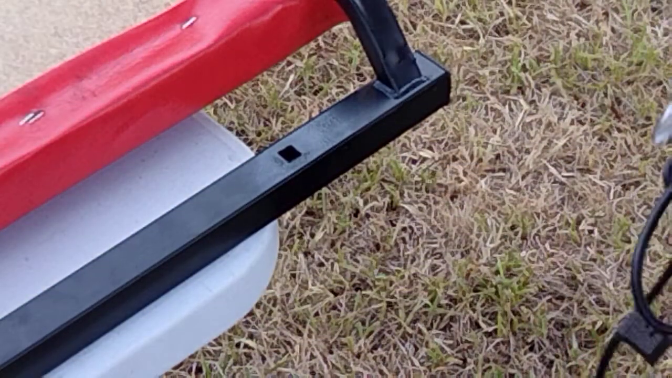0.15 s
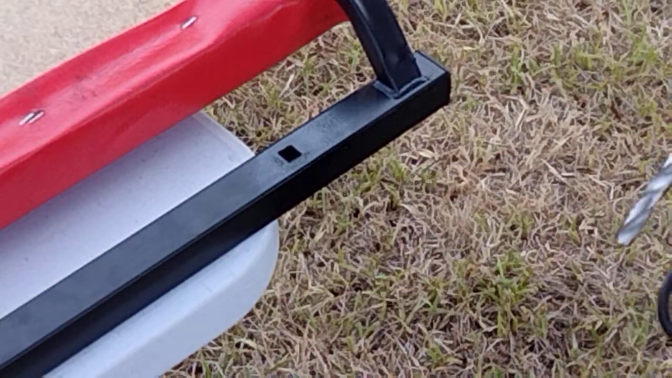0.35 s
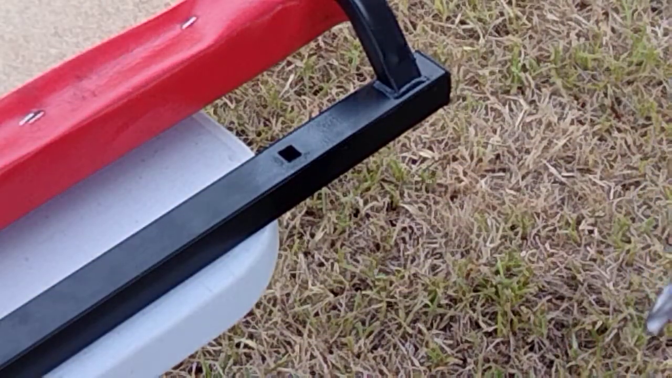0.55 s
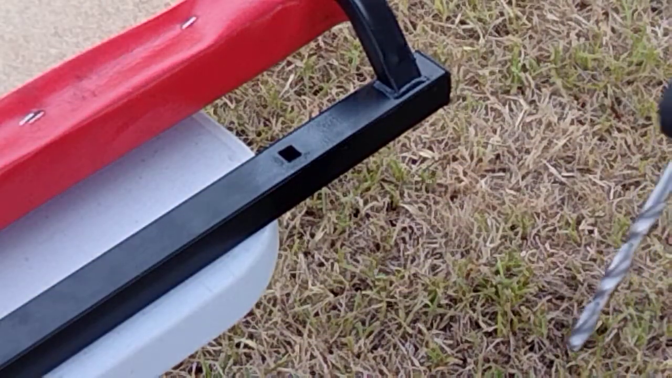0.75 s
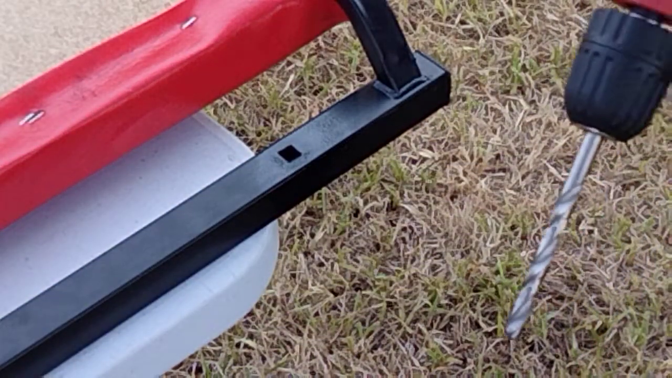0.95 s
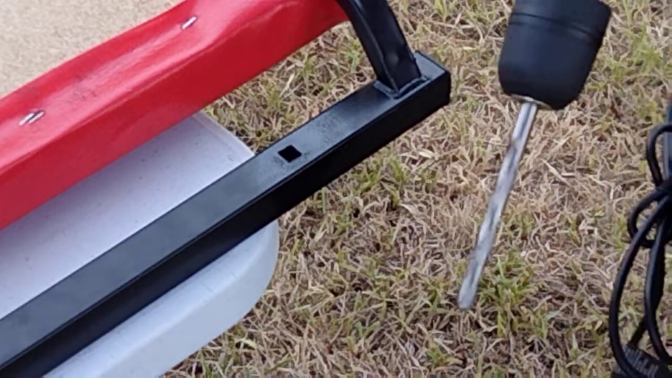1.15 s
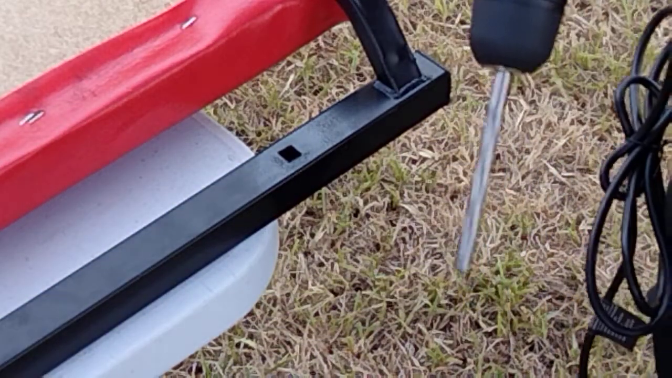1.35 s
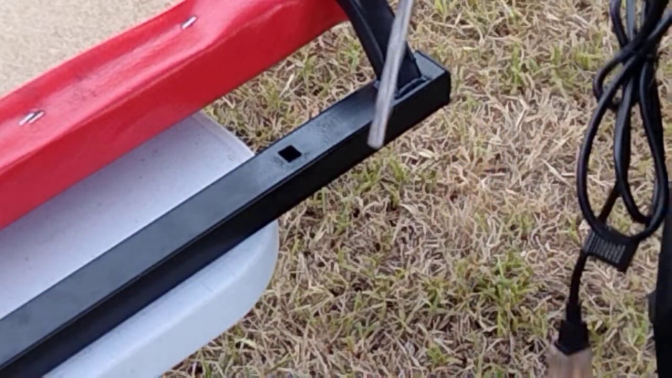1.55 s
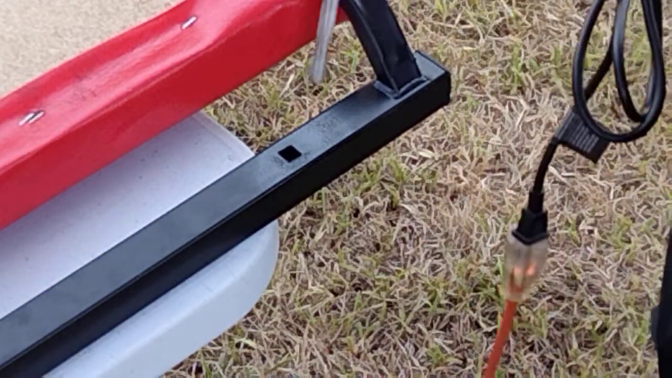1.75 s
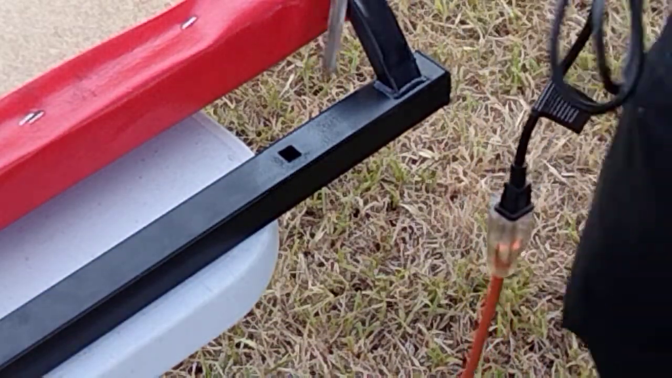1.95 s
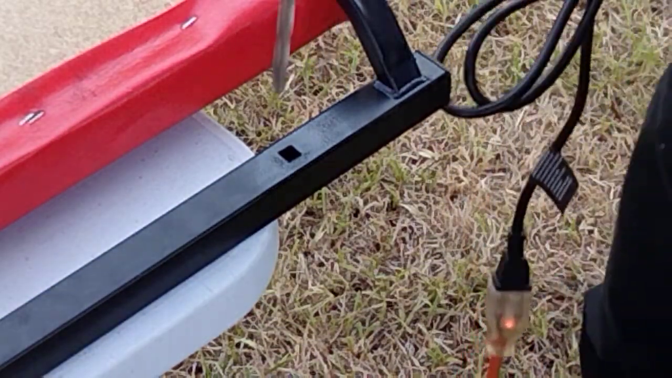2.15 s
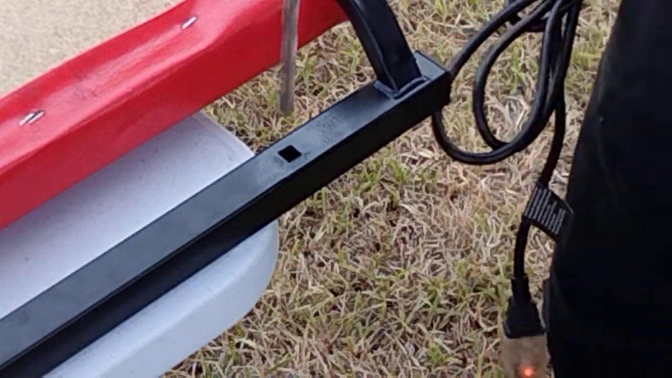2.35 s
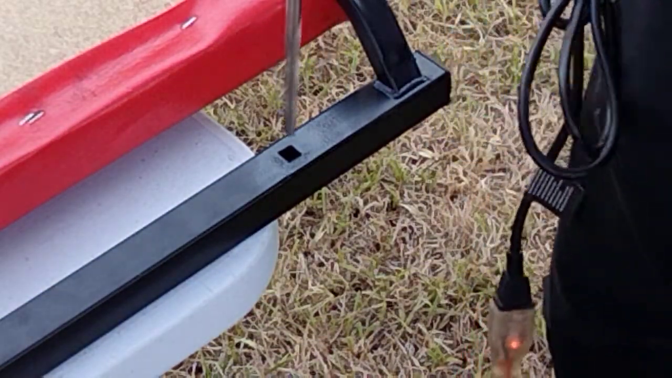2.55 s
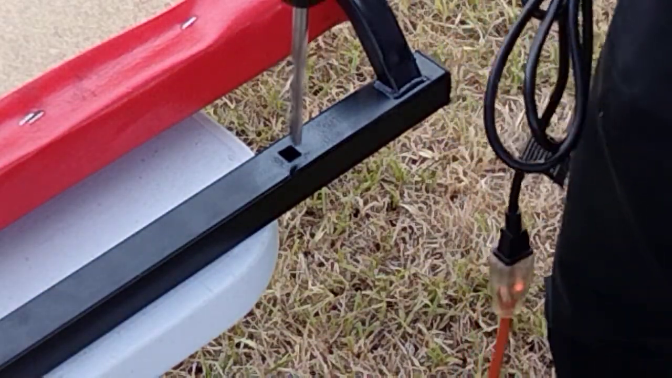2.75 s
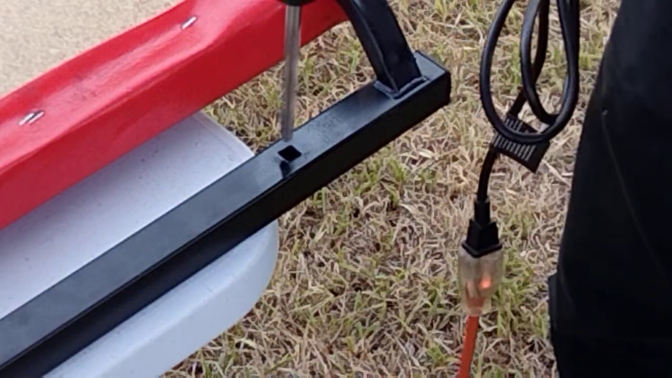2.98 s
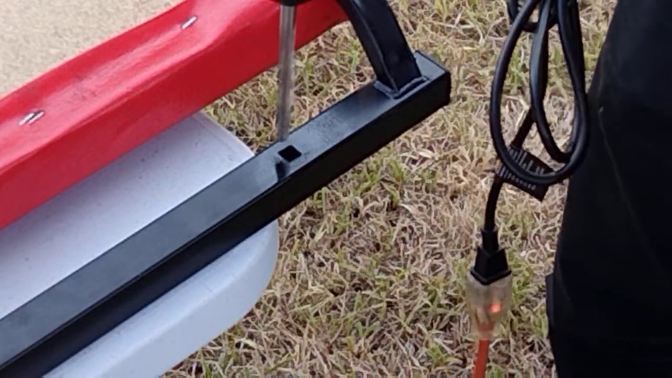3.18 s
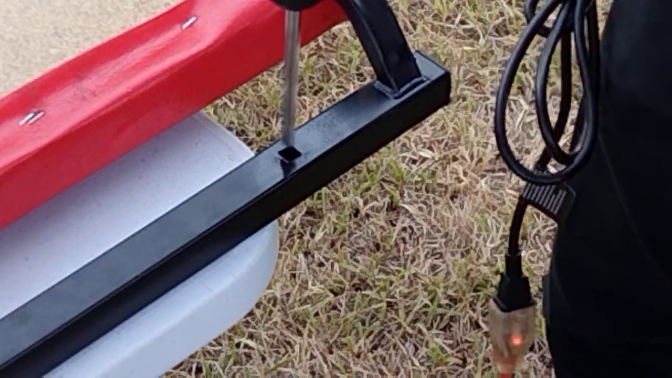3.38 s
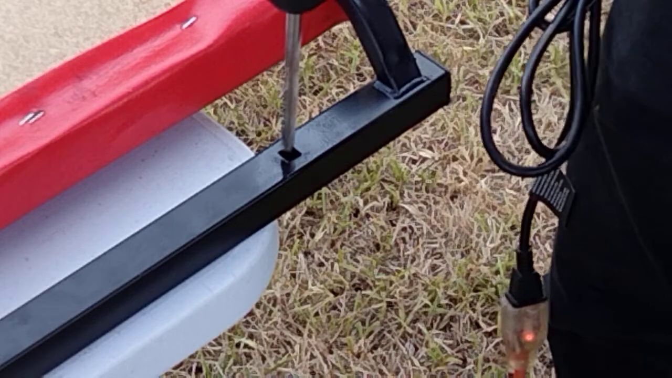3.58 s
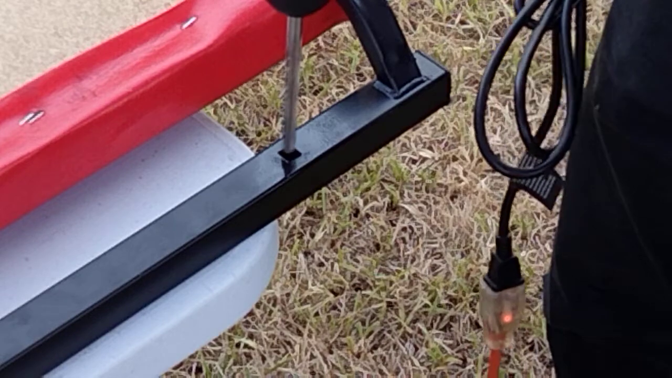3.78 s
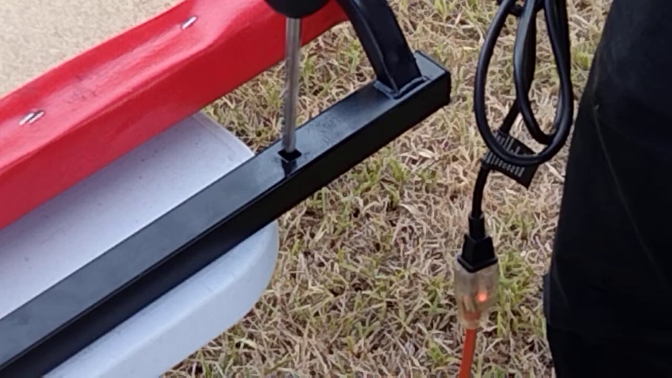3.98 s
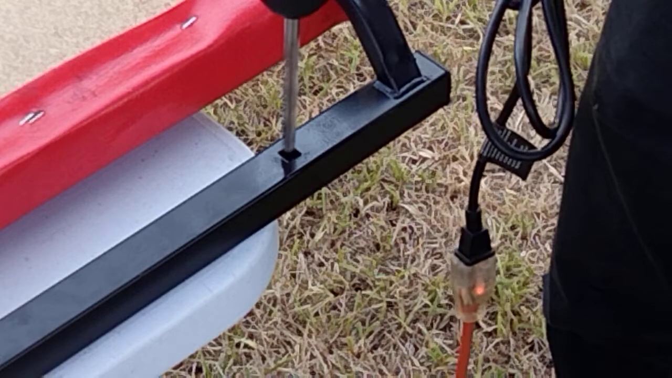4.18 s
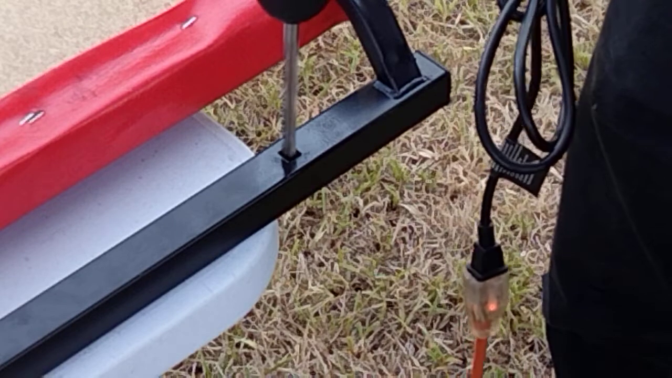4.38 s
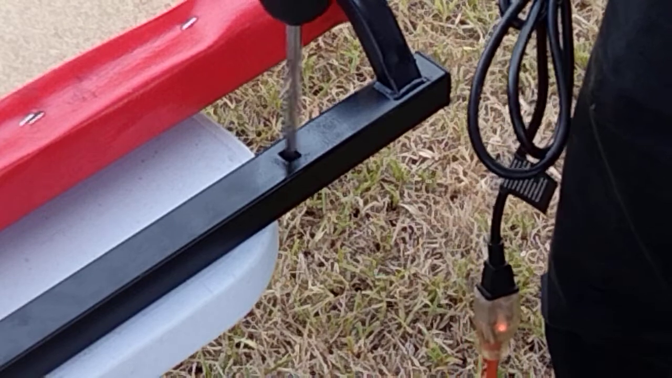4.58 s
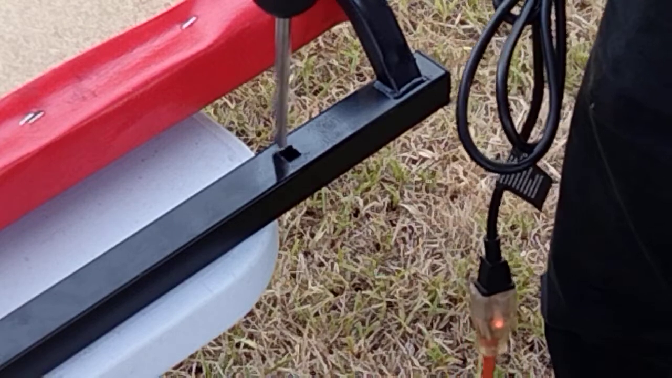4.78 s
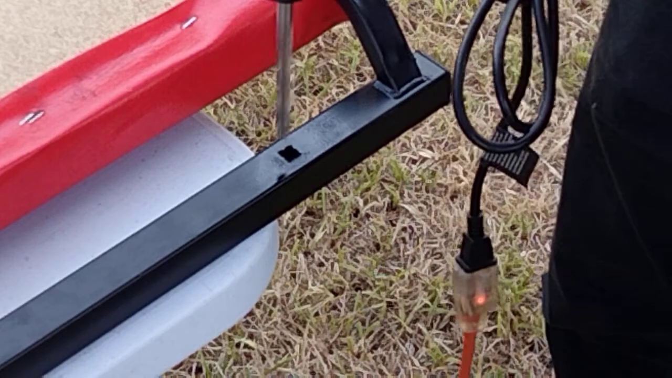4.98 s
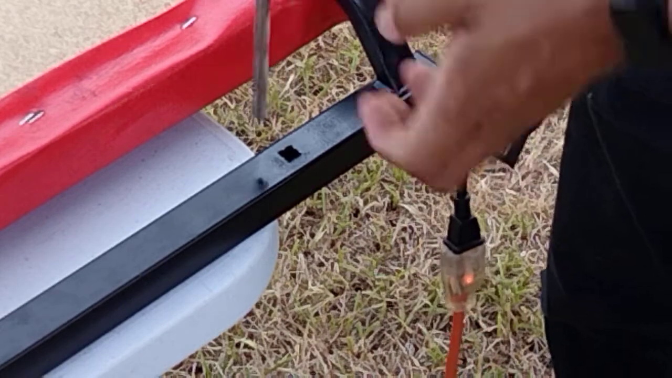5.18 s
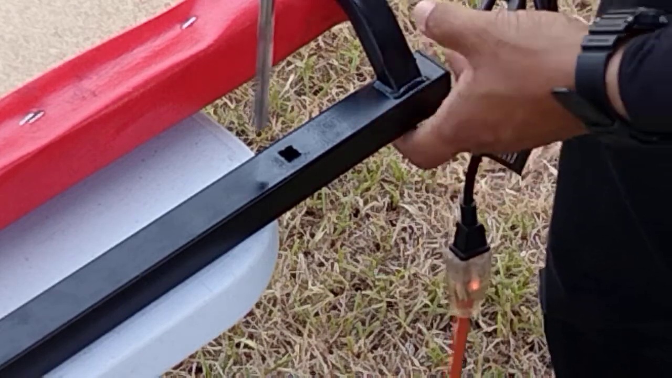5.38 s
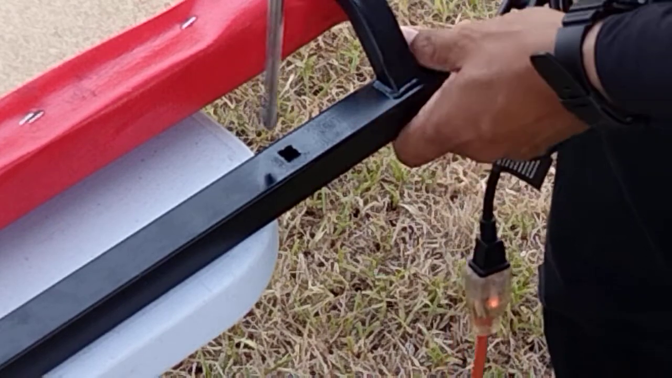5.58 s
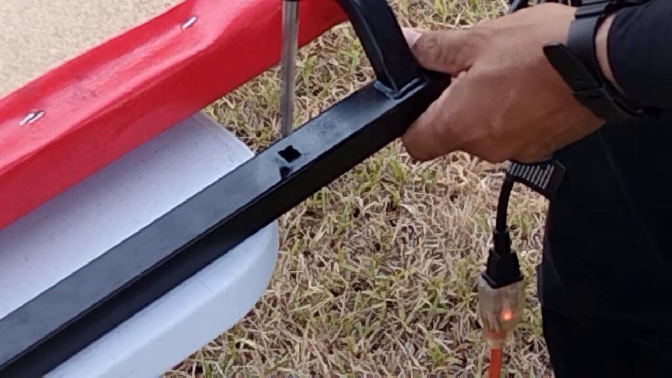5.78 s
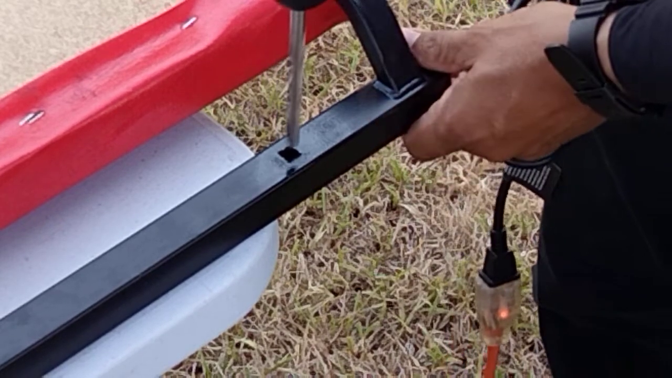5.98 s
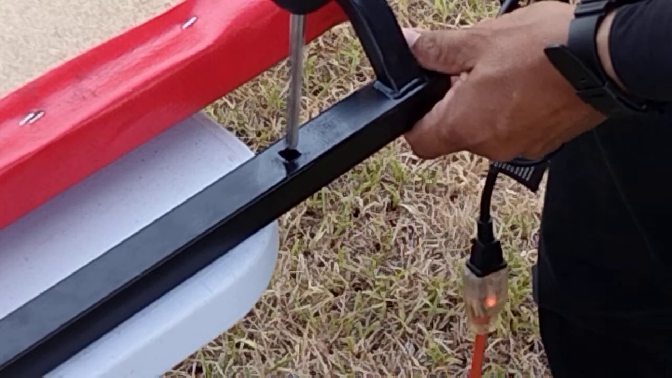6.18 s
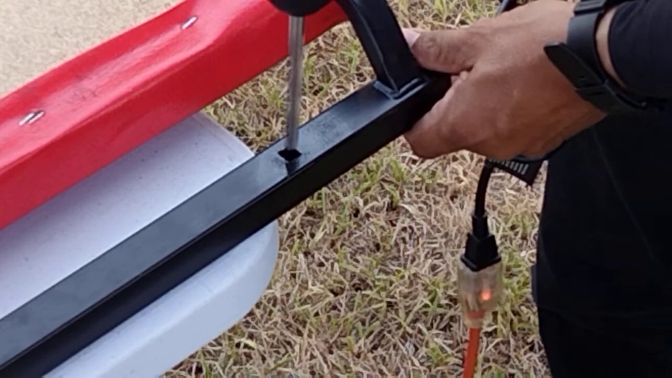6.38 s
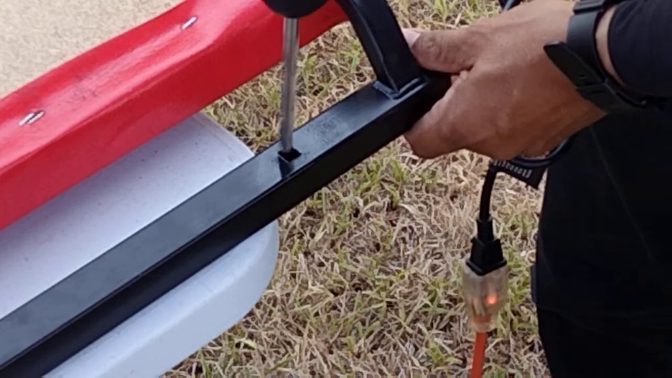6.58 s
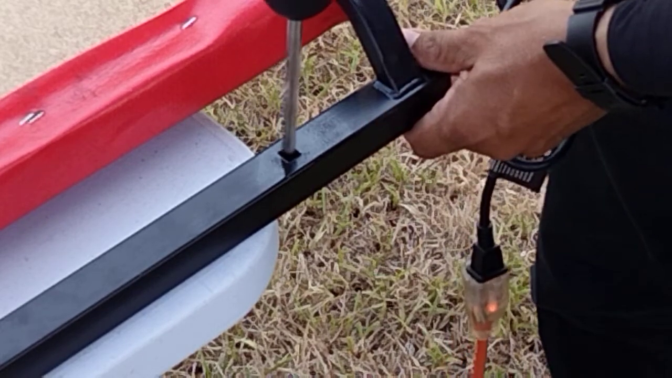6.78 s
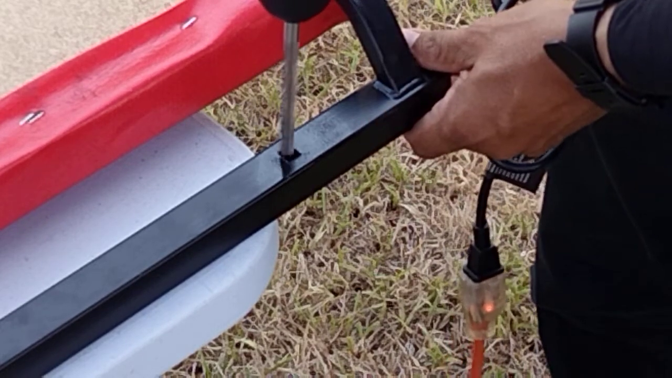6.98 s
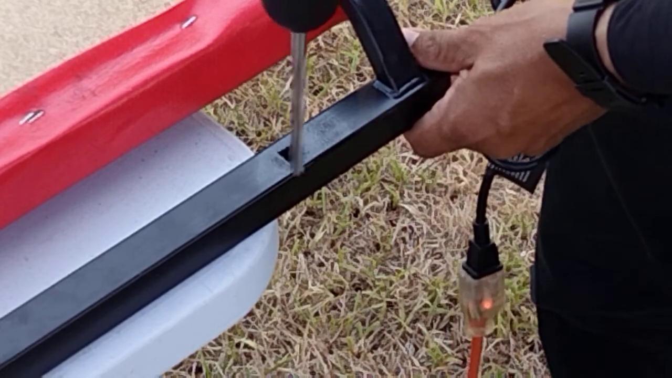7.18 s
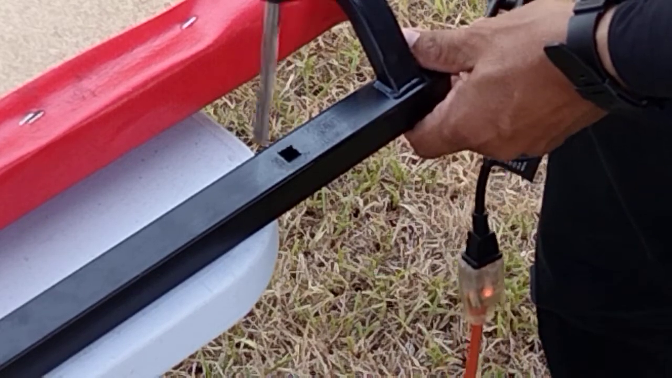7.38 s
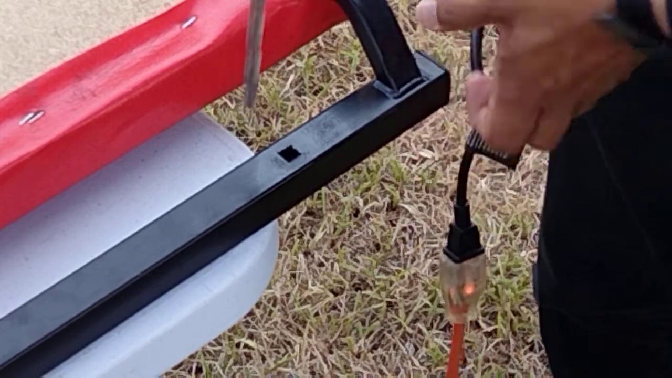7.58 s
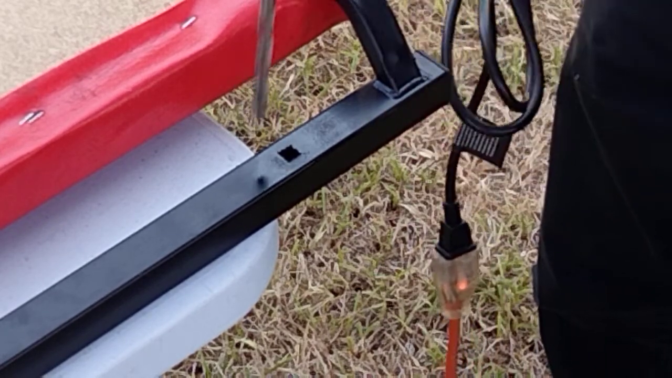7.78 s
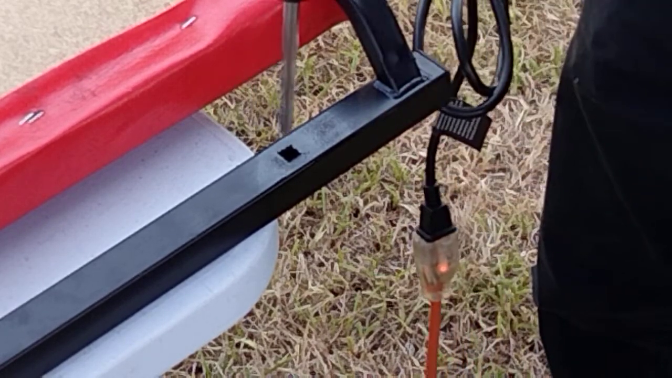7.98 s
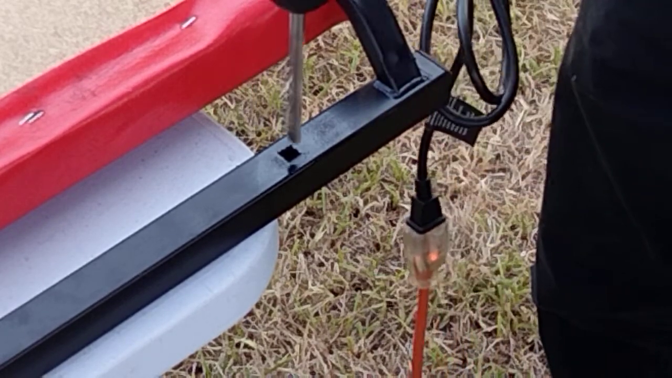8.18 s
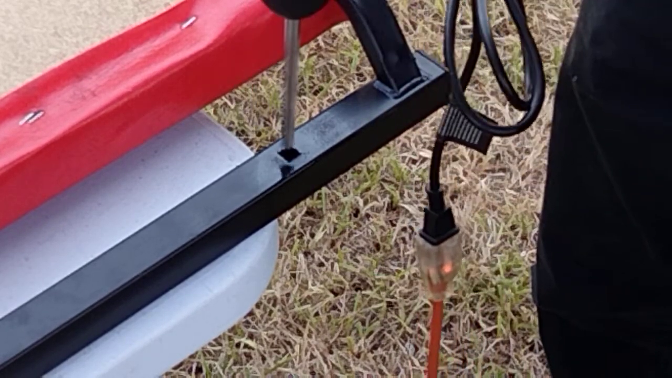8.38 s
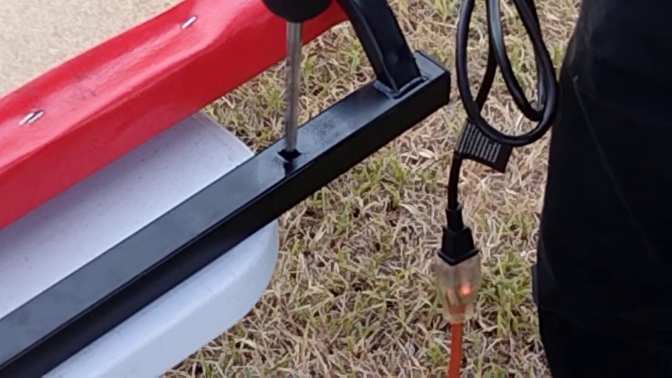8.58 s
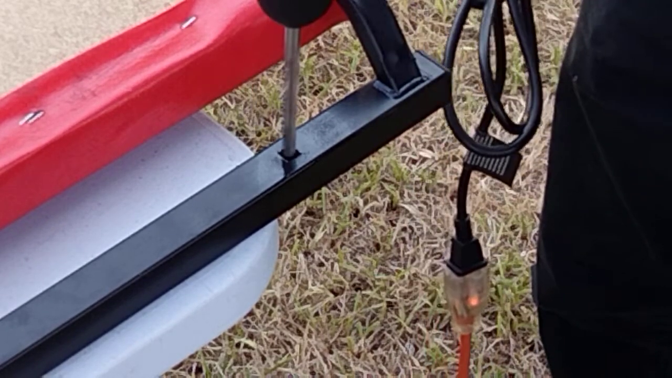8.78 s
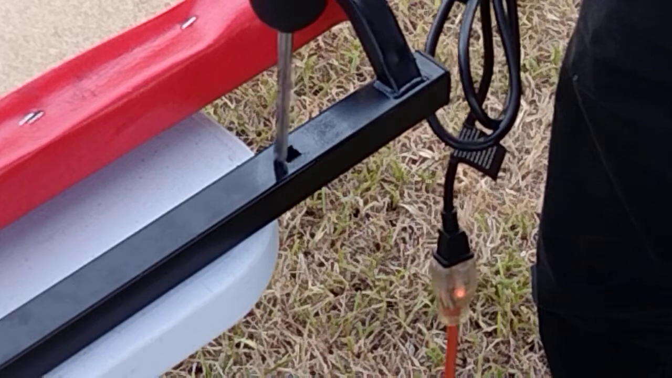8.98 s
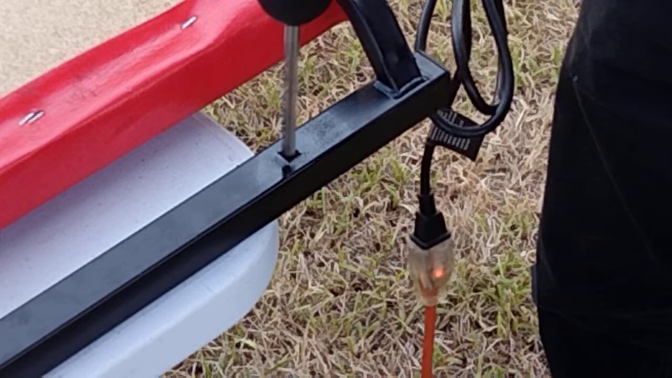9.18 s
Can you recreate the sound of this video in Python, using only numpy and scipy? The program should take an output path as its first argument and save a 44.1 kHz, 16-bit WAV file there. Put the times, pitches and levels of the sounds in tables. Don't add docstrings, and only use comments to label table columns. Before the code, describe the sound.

Outdoors on a lawn, heard by a close stereo microphone. For the first 1.2 seconds there is only soft airy hush, low wind rumble, faint insect shimmer, a distant engine drone and a short buzzy bird call at 0.2 and again at 1.05 seconds, with a couple of weak ticks near 0.45. At 1.2 a switch click and a rapid rattle of gear ticks start a corded drill close by. It throbs roughly at first, rises quickly in pitch, and reaches near full speed by about 4 seconds: low hum, piercing whine, wide fan and brush roar. A far engine swell peaks near 2.8 behind it. Dull steel knocks with short low scraping come at 4.7, lightly at 6.9, hard with sharp cracks at 7.2, and at 8.95. The colour shifts around 5.1 and 7.8 as the drill is moved, then it sounds slightly farther, still running at the end, 9.2.

```python
import sys
import numpy as np
from scipy import signal
from scipy.fft import rfft, irfft, next_fast_len
from scipy.io import wavfile
from scipy.ndimage import uniform_filter1d

SR = 44100
rng = np.random.default_rng(int(sys.argv[2]) if len(sys.argv) > 2 else 0)


def bounce(signal):
    frames = np.transpose(np.atleast_2d(signal))
    limited = np.clip(frames, -1, 1)
    pcm = np.round(limited * 32767).astype(np.int16)
    wavfile.write(sys.argv[1], SR, pcm)


def undo_db(level):
    steps = np.asarray(level, float) / 20
    return 10 ** steps


N = 407484
T = np.arange(N) / SR
HZ = np.maximum(np.fft.rfftfreq(N, 1 / SR), 1)
SWITCH_S, MAINS_BEAT_HZ = 1.19, 120


def rms_one(x):
    return x / np.sqrt(np.mean(x ** 2) + 1e-20)


def in_time(rows, start=0):
    s, *columns = np.transpose(rows)
    return [np.interp(T - start, s, c) for c in columns]


def at_hz(rows, hz, axis=1):
    return np.interp(np.log(hz), np.log(np.array(rows)[:, 0]), np.array(rows)[:, axis])


def bumps(s, half, flat=2):
    return np.exp(-abs((T - np.c_[s]) / np.c_[half]) ** flat)


def bandpass(x, order, low_hz, high_hz):
    return signal.sosfilt(signal.butter(order, [low_hz, high_hz], "band", fs=SR, output="sos"), x)


def drift(rate):
    r = np.exp(-128 * np.pi * rate / SR)
    slow = signal.lfilter([1], [1, -2 * r, r * r], rng.standard_normal(N // 64 + 2002))[2000:]
    return np.interp(np.arange(N) / 64, np.arange(len(slow)), rms_one(slow - slow.mean()))


def tone(hz, level_db, flutter_db):
    height = np.sqrt(2) * undo_db(level_db + flutter_db * drift(6.1))
    turns = np.cumsum(hz + 0 * T) / SR + rng.random()
    return height * np.sin(2 * np.pi * turns)


def ring(clicks, hz, t60):
    r, w = undo_db(-60 / (t60 * SR)), 2 * np.pi * hz / SR
    return signal.lfilter([0, np.sin(w)], [1, -2 * r * np.cos(w), r * r], clicks + 1e-18)


# pitch_hz, left_db (per Hz), right_db (per Hz), likeness (-1 to 1)
PORTS = [(240, -28.5, -28, 0.99), (580, -11.5, -12.5, 1), (944, -5.5, -5.5, 0.94),
         (1625, -13.5, -12.5, 0.52), (2630, -14.5, -15, 0.12), (3250, -13, -15, 0.93),
         (4100, -15.5, -9.5, 0.32), (4500, -13, -15.5, 0.28), (6490, -24, -10.5, 0.18),
         (6330, -23, -8.5, -0.24), (7200, -13, -14, -0.41), (8170, -10.5, -20.5, -0.38),
         (9480, -26, -30, -0.35), (12500, -33, -32.5, 0.073), (15500, -40, -28, -0.15)]
ONE_SOURCE = .6


def stereo_noise(left_db, right_db):
    alike = at_hz(PORTS, HZ, axis=3)
    one, other = rfft(rng.standard_normal((2, N)))
    share = np.clip(np.maximum(abs(alike), ONE_SOURCE), .01, .995)
    late = np.exp(-1j * np.arccos(np.clip(alike / share, -1, 1)))
    right = share * late * one + np.sqrt(1 - share ** 2) * other
    return np.array([undo_db(left_db) * one, undo_db(right_db) * right])


# pitch_hz, level_db (per Hz)
AIR = [(15, -28), (30, -18), (64, -9), (120, -4.5), (165, 2), (260, -7), (420, -16.5), (700, -14),
       (1200, -24.5), (2500, -28.5), (5400, -36), (8000, -32.5), (9000, -40.5), (15800, -46)]
AIR_DB = -47.5
# start_s, level_db
RUMBLE = [(0, -1), (1.4, -7), (1.8, -2), (2.4, 1), (4.2, -2), (4.7, 9), (5.2, 1), (5.5, -1), (7.3, -1),
          (7.65, -6), (7.9, 1), (8.5, -5), (9.24, -3)]


def outdoor_air():
    colour = at_hz(AIR, HZ)
    spectra = stereo_noise(colour, colour)
    low = irfft(spectra * (HZ < 105), N)
    air = irfft(spectra, N)
    gusts = undo_db(.7 * drift(4))
    air = air + low * (undo_db(in_time(RUMBLE)[0] + 2.5 * drift(5)) - 1)
    return undo_db(AIR_DB) * rms_one(air) * gusts


# start_s, level_db
INSECTS = [(0, -69), (.15, -65), (.35, -70), (.6, -75), (.78, -72), (.9, -66), (1.05, -75), (9.24, -74)]


def insects():
    shimmer = bandpass(rng.standard_normal((2, N)), 2, 7300, 8600)
    return undo_db(*in_time(INSECTS)) * rms_one(shimmer)


# pitch_hz, level_db (rms)
DRONE = [(75.4, -71.5), (150.7, -61), (226.1, -69), (301.5, -63.5), (382, -72)]
# start_s, level_db
DRONE_SWELL = [(0, 7.5), (.8, 11.5), (1.5, 12.5), (2.2, 6.5), (4, 5.5), (6, -10), (9.24, 4)]


def drone():
    return undo_db(*in_time(DRONE_SWELL)) * sum(tone(f, db, 2.0) for f, db in DRONE)


# start_s (centre), pitch_hz, level_db, half_length_s
SWELLS = [
    (0, 177, -49.5, .4),
    (1.8, 171, -49, 0.94),
    (2.196, 173, -44, 0.25),
    (2.844, 174.3, -32, 0.4),
    (3.705, 176, -46, 0.52),
    (4.495, 180.2, -43.5, 0.19),
    (5.204, 172.6, -46.5, 0.68),
    (5.908, 164, -62, 0.42),
    (7.294, 154, -46.5, 0.48),
    (8.298, 151.6, -47.5, 0.81),
]


def engine():
    s, hz, db, half = np.transpose(SWELLS)
    return tone(np.interp(T, s, hz), 0, 1.2) * (undo_db(db) @ bumps(s, half, flat=3))


# start_s (within the call), pitch_hz, level_db, roughness (0 up)
CALL = [(-.025, 5900, -20, .6), (-.004, 4900, -26, .6), (0, 3700, -13, .05), (.012, 4700, -4, .05),
        (.025, 5150, 0, .1), (.035, 4050, -2, .3), (.048, 4500, -13, .8), (.058, 3650, -1, .5),
        (.075, 4000, -3, 1.1), (.115, 3550, -5, 1.2), (.145, 3300, -22, 1.2)]
# start_s, level_db
CALLS_AT = [
    (0.186, -44.5),
    (1.056, -45),
]
TAIL_DB, TAIL_T60_S = -42, .6


def bird():
    out = np.zeros(N)
    for s, db in CALLS_AT:
        hz, level_db, rough = in_time(CALL, s)
        wobble_hz = 400 * rough * drift(259)
        chop_hz = 330 + 60 * rough * drift(55)
        chop = .5 + .5 * np.cos(2 * np.pi * np.cumsum(chop_hz) / SR)
        whistle = 2 * np.sin(2 * np.pi * np.cumsum(hz + wobble_hz) / SR)
        out += undo_db(db + level_db) * chop * whistle * (abs(T - s - .107) < .133)
    after = T[:SR // 2]
    tail = undo_db(TAIL_DB - 60 * after / TAIL_T60_S) * rng.standard_normal(len(after)) * (after > .01)
    return out + .3 * np.roll(out, 620) + signal.fftconvolve(out, tail)[:N]


def background():
    far = (drone() + engine()) * undo_db([[-.3], [.3]]) + bird() * undo_db([[-2.5], [2.5]])
    far = np.array([np.roll(far[0], round(.00045 * SR)), far[1]])
    return outdoor_air() + insects() + far


# start_s, level_db (peak)
KNOCKS = [
    (1.193, -42),
    (4.67, -25),
    (6.9, -36),
    (7.232, -24.5),
    (8.948, -26),
]
# pitch_hz, level_db, t60_s
TUBE = [(150, -3, .08), (185, 0, .11), (235, -9, .06), (310, -12, .06), (400, -9, .07), (700, -8, .05),
        (1500, -8, .03)]


def knocks():
    at, out = [round(s * SR) for s, db in KNOCKS], np.zeros(N)
    for hz, level_db, t60 in TUBE:
        strike_db = np.array(KNOCKS)[:, 1] + level_db - 1.5 + rng.normal(0, 1.5, len(at))
        clicks = np.zeros(N)
        clicks[at] = undo_db(strike_db) * rng.choice([-1, 1], len(at))
        out += ring(clicks, hz, t60)
    return bandpass(out, 2, 110, 2200)


GRIND_DB, GRIND_T60_S = -13, .3


def grind():
    shape = 0
    for s, db in KNOCKS:
        shape = shape + undo_db(db + GRIND_DB - 60 * np.maximum(T - s, 0) / GRIND_T60_S) * (T > s)
    return shape * rms_one(bandpass(rng.standard_normal(N), 2, 150, 420))


# start_s, level_db (peak), brightness_hz
TICKS = [(.42, -43, 950), (.461, -38, 620), (1.167, -42, 7500), (1.192, -33, 4500), (1.198, -31, 2800),
         (1.208, -36, 3500), (1.2165, -26, 4000), (1.225, -33, 3000), (1.2335, -24, 3000),
         (1.242, -26, 2000), (1.25, -30, 3500), (1.276, -30, 5000), (7.204, -17, 2000), (7.224, -11, 2000),
         (7.231, -14, 3300), (7.236, -17, 1800)]
THUMP_HZ, THUMP_DB, THUMP_T60_S = 705, -29.5, 0.035


def ticks():
    out = np.zeros(N)
    n = np.arange(400)
    for s, db, hz in TICKS:
        at = round(s * SR)
        burst = rng.standard_normal(400) * np.exp(-n / (max(.001, 1.5 / hz) * SR))
        crack = bandpass(burst, 1 + 2 * (hz < 1000), hz * .45, hz * 1.9)
        out[at:at + 400] += undo_db(db) * crack / np.abs(crack).max()
    push = undo_db(THUMP_DB) * (np.arange(N) == round((SWITCH_S + .002) * SR))
    out += ring(push, THUMP_HZ, THUMP_T60_S)
    return signal.sosfilt(signal.butter(4, 8600, fs=SR, output="sos"), out)


TOP_SPEED, CREEP_PER_S = 446.7, 1.54
# lack_turns_per_s, time_constant_s
WIND_UP = [(216.8, .116), (150.7, .311), (36.5, 1.03)]


def rotor_speed():
    on = np.maximum(T - SWITCH_S, 0)
    return TOP_SPEED + CREEP_PER_S * on - sum(lack * np.exp(-on / tau) for lack, tau in WIND_UP)


# start_s, nearness_db, facing_db (vents towards the ports), left_right_db
HOLD = [(1.19, -1.5, -5, -2.5), (2.0, 0, 0, -1.5), (2.8, 0, 1, -4.5), (3.9, -1, 1.5, -4.5),
        (4.6, -1, 1, -4.5), (5.05, -1.5, 1.5, -7), (5.2, 0, 1, 1.5), (5.6, -0.5, 0.5, -5), (6.4, 0, 1, -4),
        (7.2, -1, 1.5, -3.5), (7.65, 0, 1.5, -4), (7.85, -2.5, -1.5, -3), (8.7, -3.5, -2, -2.5),
        (9.24, -3.5, -1.5, -4.5)]
# start_s (centre), nearness_change_db, facing_change_db, half_length_s
JOLTS = [
    (2.35, -1.5, 4, 0.01),
    (4.827, 0, -3, 0.022),
    (5.15, -2, 0, 0.035),
    (7.242, 2, -1.5, 0.023),
    (7.324, 0.5, -2.5, 0.036),
]


def held():
    near_db, facing_db, pan_db = in_time(HOLD)
    s, near, facing, half = np.transpose(JOLTS)
    shape = bumps(s, half)
    return near_db + near @ shape, facing_db + facing @ shape, pan_db


# pitch_hz, half_width_hz, grip1_db,
# grip2_db, grip3_db
DIPS = [(1665, 81, 0.5, -1.5, 0), (1830, 35, -2, 0.5, 0), (2415, 110, -1, 0.5, -3.5),
        (2640, 52, 1.7, 4.5, 0), (2796, 130, -2, -1, -4.5), (3290, 220, 1, -.5, 0.2),
        (3690, 130, -0.5, -3.5, -1), (4070, 160, 1.5, -0.5, -0.5), (4500, 140, -2, -3, 1),
        (4800, 73, -1.5, -1.5, -0.5), (5270, 73, 0, -4.5, -3), (6060, 300, 3, 3, 1), (7200, 150, 0, 2, -4),
        (7200, 133, -10.5, -3.5, 3.5), (7540, 180, -2, -2, 1.5), (8810, 140, -4.5, -1.5, 1.5),
        (9720, 300, -2.5, 3, 3), (10695, 170, -9, -8, -9), (11060, 70, 3, -5, -8), (12550, 120, -1, -3, -5),
        (8200, 81, 0.5, 1.5, -0.5), (8480, 79, -3, -1.5, -1), (9300, 100, 2, 5, 5), (9930, 230, 0, 2, 2),
        (10400, 110, -2, -1, -5), (10900, 90, 0, 7, 5), (11300, 97, -4, -4, -2), (11500, 150, -3, 1, 4),
        (11800, 170, 2, 4, 5), (12290, 100, -3, -5, 3), (12900, 140, -2, -6, 0), (13070, 100, 0, 7, -4),
        (13400, 170, 0, 1, -1), (14300, 150, -2, -3.5, -3), (14570, 90, -5, 8, 0), (15200, 110, 0, 2, 1)]
# pitch_hz, half_width_hz, grip1_db, grip2_db, grip3_db (of their difference)
APART = [(1150, 180, -10, -3, -4), (1410, 170, -1, 3, 2.5), (2060, 380, -1, -1.5, 2),
         (2570, 220, .5, -1, 4), (3080, 170, 2, 0, 7.5), (3650, 140, -9.5, 1, 7), (4150, 170, -0.5, 5, 8.5),
         (5150, 270, -5.5, -2, 5), (6050, 670, 0, 0.5, 3), (6800, 180, -4, 1, -3), (7290, 130, 11, -1, -1)]
REGRIP_S, REGRIP_TAKES_S = [5.1, 7.82], .08
ECHO_DB, ECHO_FIRST_S, ECHO_LAST_S = -23, .0025, .012


def grip_curve(rows, hz, grip):
    return undo_db(sum(row[2 + grip] * np.exp(-((hz - row[0]) / row[1]) ** 2) for row in rows))


def surroundings(x, count=10):
    both, apart = rfft([x[0] + x[1], x[0] - x[1]]) / 2
    hz = np.arange(0, SR / 2 + 5, 5.)
    lasting = rng.uniform(ECHO_FIRST_S, ECHO_LAST_S, count // 2)
    regrips = [np.clip((T - s) / REGRIP_TAKES_S + .5, 0, 1) for s in REGRIP_S]
    changed = [0 * T + 1] + regrips + [0 * T]
    out = 0
    for grip in range(3):
        colour, width = grip_curve(DIPS, hz, grip), grip_curve(APART, hz, grip)
        delays = np.append(lasting, rng.uniform(ECHO_FIRST_S, ECHO_LAST_S, count // 2))
        echoes = sum(np.exp(-2j * np.pi * hz * s) for s in delays)
        echoes = undo_db(ECHO_DB) * np.clip(hz / 1500 - .4, 0, 1) * echoes
        path = np.interp(HZ, hz, colour * (1 + echoes))
        heard = irfft(path * [both, apart * np.interp(HZ, hz, width)], N)
        out = out + (changed[grip] - changed[grip + 1]) * heard
    return np.array([out[0] + out[1], out[0] - out[1]]) * (T > SWITCH_S - .005)


# multiple, grip1_db, grip2_db, grip3_db (rms), left_right_db
ORDERS_LOW = [(3, -44, -43, -42, -4), (4, -54, -52, -43, -4), (5.25, -47, -52, -56, 0),
              (6, -49, -55, -56, -2), (7.9, -58, -56, -45, 0), (8, -46, -52, -53, 0),
              (9, -51, -56, -58, -3), (14, -56, -56, -49, -4), (15, -58, -54, -50, 0),
              (16, -60, -60, -53, 3), (18, -60, -58, -50, 6)]
ORDERS_HIGH = [(20, -64, -59, -66, 4), (22, -63, -65, -70, 2), (23, -68, -63, -67, 2),
               (25, -68, -70, -65, 0), (26, -72, -65, -70, 0), (27, -67, -70, -67, 0),
               (28, -78, -78, -73, -3), (30, -78, -78, -68, -3), (32, -73, -75, -80, 0),
               (33.2, -80, -80, -73, 0), (36, -61, -61, -61, -3)]


def orders(rows):
    speed, out = rotor_speed(), 0
    times = np.add.outer(REGRIP_S, [-REGRIP_TAKES_S, REGRIP_TAKES_S]).ravel()
    for k, first, second, third, pan_db in rows:
        level_db = np.interp(T, times, [first, second, second, third]) + 60 * np.log10(speed / TOP_SPEED)
        out = out + tone(k * speed, level_db, 2.5) * undo_db([[pan_db / 2], [-pan_db / 2]])
    return out * (T > SWITCH_S)


# level_db (at top speed), power_of_speed, nearness_share
HUM_LAW = [(-33, 4.6, .8), (-32, 4.5, .4)]
WHOOSH_DB, WHOOSH_POWER, WHOOSH_WIDTH_HZ = -32, 2.1, 160


def hum(speed, speed_db):
    near_db = held()[0]
    first_db, second_db = [db + power * speed_db + near * near_db for db, power, near in HUM_LAW]
    unbalance = tone(speed, first_db, 0.9)
    shake = np.array([unbalance, np.roll(unbalance, 4)])
    shake = shake + tone(2 * speed, second_db, 2.0)
    whoosh = tone(2 * speed, WHOOSH_DB + WHOOSH_POWER * speed_db, 0) * drift(WHOOSH_WIDTH_HZ)
    take_up = np.clip(np.maximum(T - SWITCH_S, 0) / 0.16, 0, 1)
    return (shake + whoosh * take_up) * undo_db([[-.5], [.5]]) * (T > SWITCH_S)


# pitch_hz, level_db
SLOTS_OUT = [(500, -75), (2000, -55), (2250, -40), (2780, -30), (3100, -36), (3450, -40), (3650, -46),
             (4300, -47), (4600, -50), (5350, -47), (5500, -49)]
# pitch_hz, level_db
BEAT_OUT = [(2000, -78), (4000, -58), (4700, -48), (5250, -48), (5330, -50), (5358, -48), (5368, -43),
            (5400, -43)]
# pitch_hz, level_db, left_right_db
BARS_OUT = [(1500, -75, 8), (3700, -50, 8), (4600, -62, 8), (6950, -62, 10), (7200, -42, 11),
            (8250, -40, 11), (8900, -50, 8), (9700, -55, 6), (10400, -60, 4), (10800, -65, 3),
            (10900, -58, 5), (10950, -58, 3)]


def whines(speed, throb):
    slot_hz, bar_hz = 12 * speed, 24 * speed
    side_hz = slot_hz - MAINS_BEAT_HZ
    depth = np.clip(1.5 * throb - .1, 0, 1)
    beat = 1 + depth * np.cos(2 * np.pi * MAINS_BEAT_HZ * (T - 1.1905))
    slots = tone(slot_hz, at_hz(SLOTS_OUT, slot_hz), 1.2) * beat
    slots = slots + tone(side_hz, at_hz(BEAT_OUT, side_hz), 2.5)
    bars = tone(bar_hz, at_hz(BARS_OUT, bar_hz), 3)
    pan_db = at_hz(BARS_OUT, bar_hz, axis=2)
    both = slots * undo_db([[-1.5], [1]]) + bars * undo_db([pan_db / 2 - 1, -pan_db / 2 - 1])
    return both * (T > SWITCH_S)


# from_hz, rattle_db, top_speed_db, power_of_speed, nearness_share, facing_share
ROAR_LAW = [(102, -36, -34.5, 6.2, 0.8, -0.16), (846, -40.5, -28.5, 4, 0.7, -0.75),
            (1293, -39, -31, 4.7, 0.39, -0.42), (2926, -36.5, -29.5, 6.6, 1.57, -0.017),
            (4806, -37, -32, 4.6, 0.6, 0.49), (8700, -50.5, -49, 6.3, 0.34, 1.05)]


def roar(speed_db, throb, patch_db=0.5, fast_db=1.11, shared_db=0.0):
    near_db, facing_db, pan_db = held()
    noise = stereo_noise(at_hz(PORTS, HZ), at_hz(PORTS, HZ, axis=2))
    swing_db = pan_db - pan_db.mean()
    tops, out = [row[0] for row in ROAR_LAW[1:]] + [16000], 0
    for (low, rattle_db, top_db, power, near, facing), high in zip(ROAR_LAW, tops):
        edges, region = np.geomspace(max(low, 400), high, 4), 0
        edges[0] = low
        for a, b in zip(edges, edges[1:]):
            band = irfft(noise * ((HZ >= a) & (HZ < b)), N)
            flicker_db = [patch_db * drift(0.74) * (a > 1200) + fast_db * drift(20.5) for side in band]
            region = region + band * undo_db(flicker_db)
        if low > 4000:
            region = region * undo_db(np.array([swing_db, -swing_db]) / 2)
        level = np.hypot(undo_db(rattle_db), undo_db(top_db + power * speed_db))
        level = level * undo_db(near * near_db + facing * facing_db)
        out = out + level * region / np.sqrt(np.mean(region.mean(axis=0) ** 2))
    throb = np.clip(throb - .1, 0, 1) ** 3
    beat = 1 + throb * np.cos(2 * np.pi * MAINS_BEAT_HZ * (T - 1.192))
    take_up = np.clip((T - 1.186) / .2, 0, 1) ** .9
    return out * beat / np.sqrt(1 + throb ** 2 / 2) * undo_db(shared_db * drift(27)) * take_up


THROB_LEAST, THROB_HALF_SPEED, THROB_POWER = .1, 280, 6.0


def motor():
    speed = rotor_speed()
    speed_db = 20 * np.log10(speed / TOP_SPEED)
    throb = THROB_LEAST + (1 - THROB_LEAST) / (1 + (speed / THROB_HALF_SPEED) ** THROB_POWER)
    lines = whines(speed, throb) + orders(ORDERS_LOW) + orders(ORDERS_HIGH)
    return lines + surroundings(hum(speed, speed_db) + roar(speed_db, throb))


def scene():
    return background() + knocks() + grind() + ticks() + motor()


# pitch_hz, threshold_db (against the neighbourhood)
GATE = [(50, -30), (250, -19), (900, -16), (1600, -6), (2200, -4), (2750, -1), (3600, -8), (4200, -6.5),
        (4800, 0), (5500, -4.5), (6200, -5), (7200, -1), (8100, -4.5), (9000, 0), (10500, 0), (12000, 2),
        (15800, 0.5)]
FRAME, FRAME_LEAD = 1024, 1720
WEAKER_DB = -7.5


def gate(x, scatter_db=4.0, reach_hz=1100):
    n, k = np.arange(2 * FRAME)[:, None] + .5, np.arange(FRAME) + .5
    cell_hz = k * SR / 2 / FRAME
    window = np.sqrt(2 / FRAME) * np.sin(np.pi * n / 2 / FRAME)
    basis = window * np.cos(np.pi / FRAME * (n + FRAME / 2) * k)
    count = N // FRAME + 4
    blocks = np.zeros((2, count * FRAME))
    blocks[:, FRAME_LEAD:FRAME_LEAD + N] = x[0] + x[1], x[0] - x[1]
    blocks = blocks.reshape(2, count, FRAME)
    cells = np.concatenate([blocks[:, :-1], blocks[:, 1:]], axis=2) @ basis
    power = uniform_filter1d(np.mean(cells ** 2, axis=0), size=5, axis=1)
    around = uniform_filter1d(power, round(reach_hz * 2 * FRAME / SR), axis=1)
    uneven = rng.standard_normal((count - 1, FRAME // 8))
    uneven = np.repeat(uniform_filter1d(uneven, size=3, axis=0), 8, axis=1) * np.sqrt(3)
    loudness = power.sum(axis=1, keepdims=True) + 1e-12
    spare = (loudness / loudness.max()).clip(1e-3) ** .12
    limit = around * spare * undo_db(2 * (at_hz(GATE, cell_hz) + scatter_db * uneven))
    own = uniform_filter1d(uniform_filter1d(cells ** 2, size=13, axis=2), size=3, axis=1)
    pair = own.mean(axis=0) * undo_db(2 * (WEAKER_DB + 1.5 * uneven)) * (cell_hz > 2300)
    back = (cells * (power > limit) * (own > pair)) @ basis.T
    joined = (back[:, 1:, :FRAME] + back[:, :-1, FRAME:]).reshape(2, -1)
    mid, side = joined[:, FRAME_LEAD - FRAME:FRAME_LEAD - FRAME + N]
    return np.array([mid + side, mid - side]) / 2


# pitch_hz, depth (0-1)
RIPPLE = [(7800, 0), (8500, .6), (8900, .9), (9600, .35), (10800, .1), (11500, 0)]
RIPPLE_NOTCH_HZ, RIPPLE_STEP_HZ, TOP_HZ = 8950, 201, 15800


def treble_ripple(x):
    size = next_fast_len(N + 4096)
    hz = np.maximum(np.fft.rfftfreq(size, 1 / SR), 1)
    depth = np.clip(at_hz(RIPPLE, hz), 0, 1)
    ripple = 1 - depth * np.exp(-2j * np.pi * (hz - RIPPLE_NOTCH_HZ) / RIPPLE_STEP_HZ)
    ripple = ripple / np.sqrt(1 + depth ** 2) * (hz < TOP_HZ)
    return irfft(rfft(x, size) * ripple, size)[:, :N]


def roll_off(x):
    return signal.sosfilt(signal.butter(12, 17090, fs=SR, output="sos"), x)


def record(dry):
    mix = gate(treble_ripple(dry))
    return roll_off(mix)


dry = scene()
out = record(dry)
bounce(out)
```